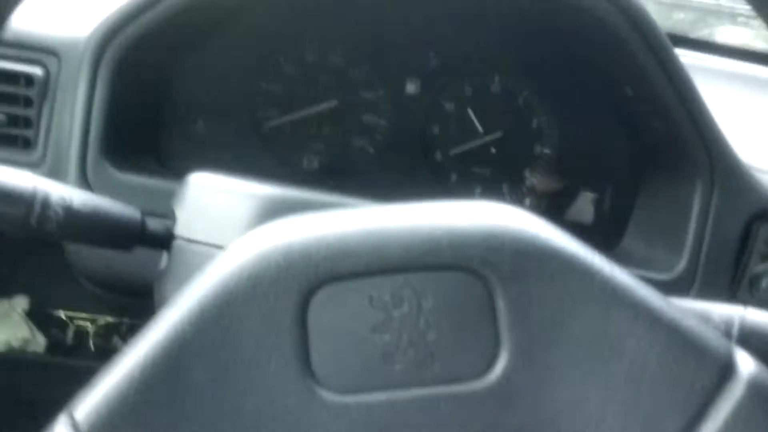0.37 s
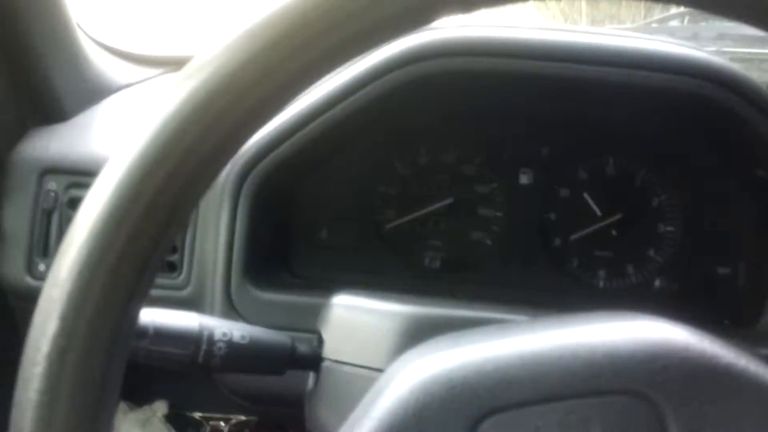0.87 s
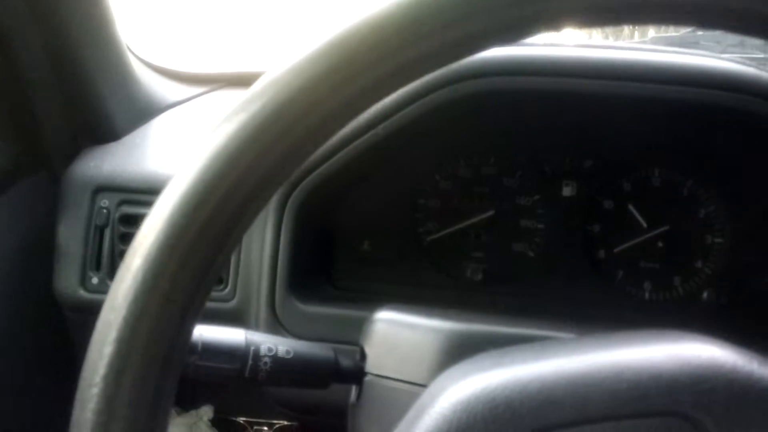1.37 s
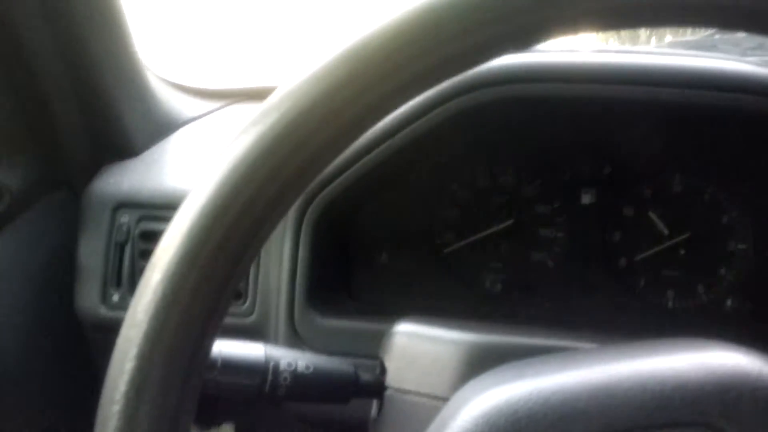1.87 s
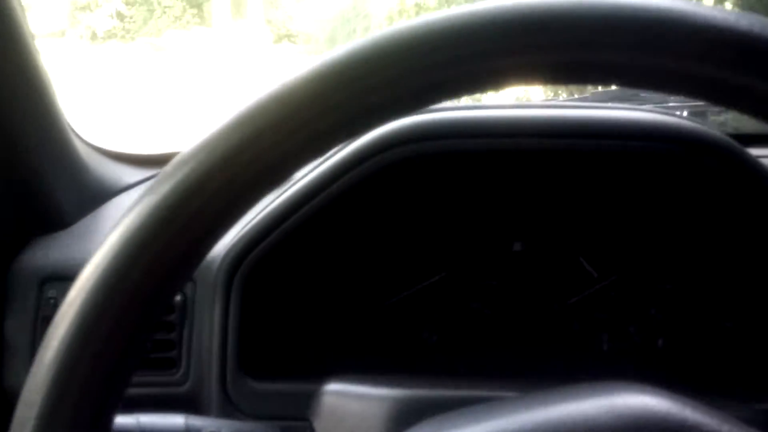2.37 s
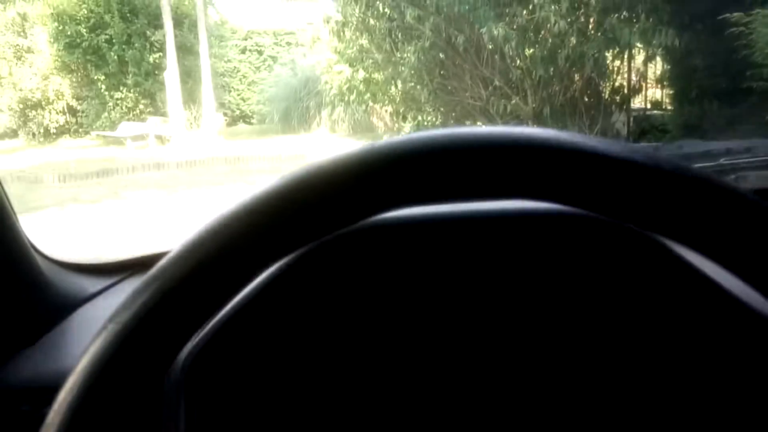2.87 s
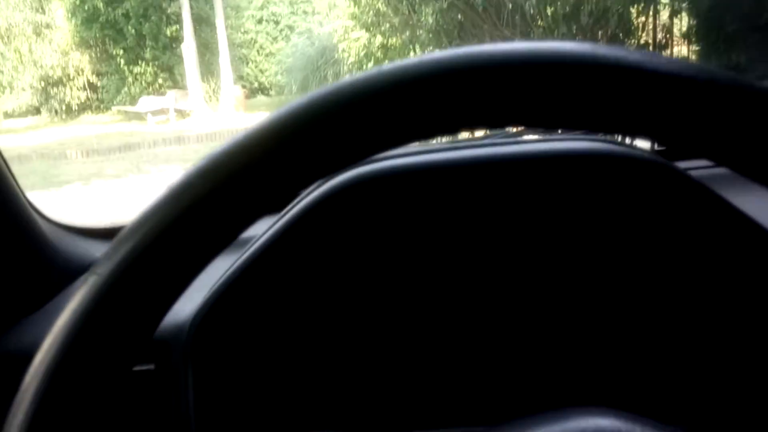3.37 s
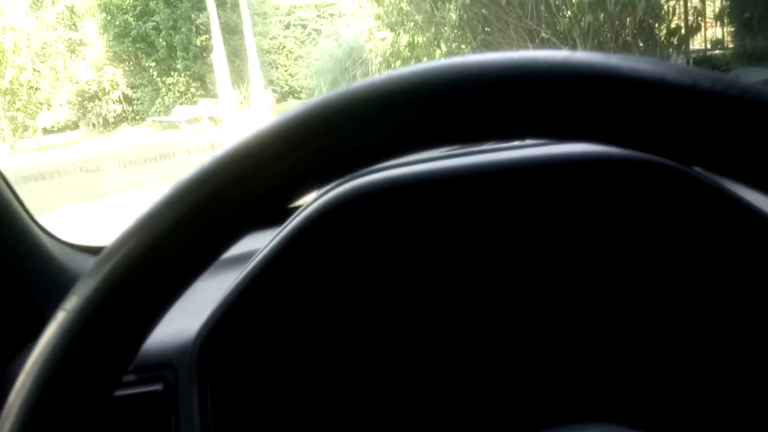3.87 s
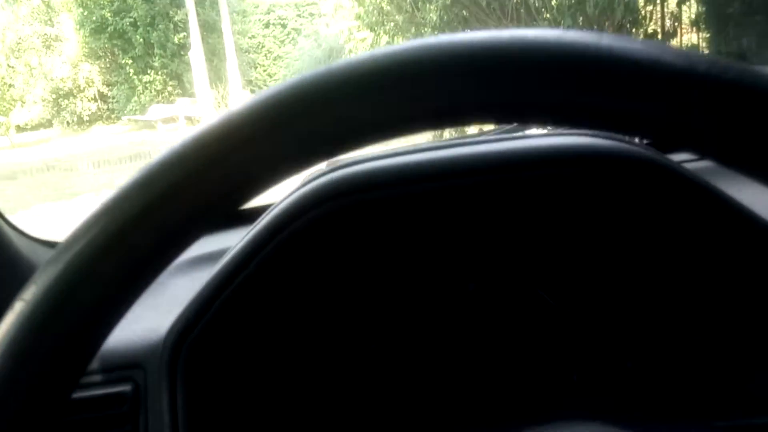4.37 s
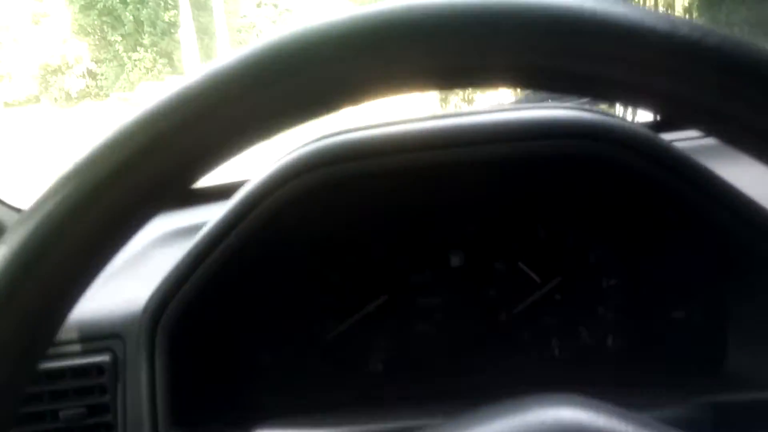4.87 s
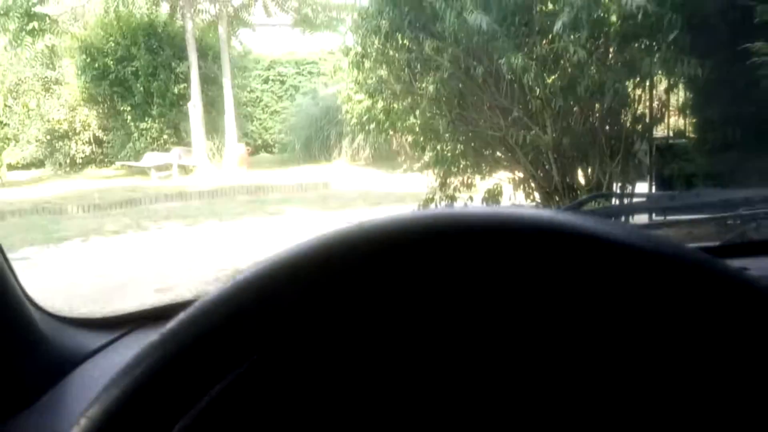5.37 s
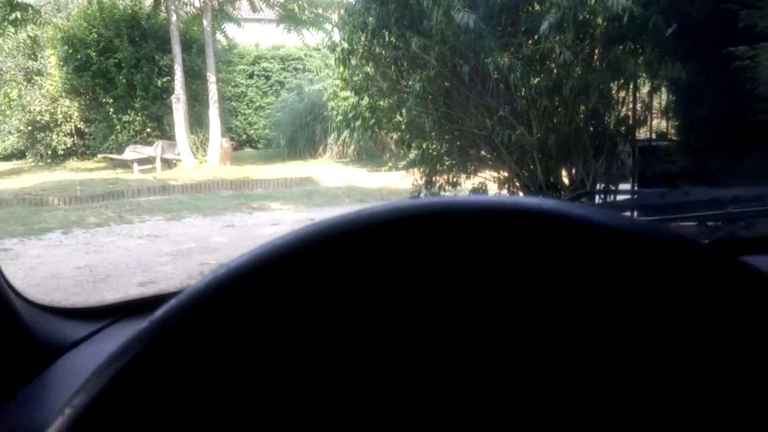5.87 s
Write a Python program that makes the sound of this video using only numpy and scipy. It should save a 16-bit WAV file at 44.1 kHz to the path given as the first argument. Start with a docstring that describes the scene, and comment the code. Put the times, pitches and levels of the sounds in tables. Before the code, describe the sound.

Inside a parked car with the engine off, a sharp key clink and thump open over a very faint hush. Small ticks, scrapes and a key rubbing in its slot follow, then a bright jingle of loose keys after two seconds. From nearly three seconds, levers and pedals knock on hollow plastic and metal, with low body thumps and late snaps. Close handheld phone microphone, small dry cabin.

```python
"""Inside a parked car, engine off, a phone near the wheel: a hush of filtered noise runs all through.
From the start a hand rustles over trim (grainy noise), the shell rocks and thumps (ringing modes), and
keys clink (sharp ticks, rattle, short pings). Soon the phone is bumped, free keys ring, small parts tick
and a key shank rubs in its slot (a gliding resonance). After two seconds levers and pedals knock on their
stops, the trim is rubbed once, the floor pan rings, and late on a sprung lever snaps into its notch."""
import sys
import numpy as np
from scipy import signal
from scipy.fft import rfft, irfft
from scipy.io import wavfile
from scipy.ndimage import uniform_filter1d

SR = 44100
rng = np.random.default_rng(int(sys.argv[2]) if len(sys.argv) > 2 else 0)


def pcm_store(signal):
    """Save signal as 16-bit PCM."""
    levels = np.round(np.clip(np.atleast_2d(signal), -1, 1) * 32767)
    wavfile.write(sys.argv[1], SR, levels.astype(np.int16).T)


def gain_from_decibels(decibels):
    """Convert decibel values to linear amplitude factors."""
    exponent = np.asarray(decibels, float) / 20
    return 10 ** exponent


N = 275184  # length in samples
T = np.arange(N) / SR  # time in seconds

# Levels in the tables are starting points: the functions add their own balance.
# Outdoor hush and microphone hiss, shape of the spectrum: f/Hz, level/dB
HUSH = [(15, -50), (25, -0.5), (118, 0), (373, -4), (561, -6), (822, -9), (1110, -10.5), (1380, -9),
        (2810, -22.5), (3400, -10), (4460, -16.5), (5260, -8.5), (10100, -32), (15200, -15), (17000, -52)]
HUSH_DB = -75  # overall rms
# Noise of rubbing or rattling surfaces, shape of the spectrum: f/Hz, level/dB
CONTACT = [(240, -73.5), (400, -11), (726, -4.5), (904, -2), (1030, 0.5), (1380, -5), (2470, 2.5),
           (2840, -2), (5240, 0), (6530, -3), (7880, -21), (10300, -10.5), (13600, -18), (15200, -4.5),
           (17000, -58.5)]
# Borders of the four bands of clinks and knocks: f/Hz
EDGES_HZ = (1100, 1600, 4000, 8000, 17000)
# Light rustle of hand and cloth: t/s, level of 2-8 kHz/dB
SLIDE = [(0, -68), (.17, -67.5), (.3, -77), (.55, -78), (.7, -71.5), (1.0, -66), (1.2, -75.5), (1.5, -80),
         (2.0, -78.5), (2.6, -77.5), (2.9, -69), (3.4, -75), (3.65, -79.5), (3.93, -64.5), (4.12, -80.5),
         (4.62, -69.5), (5.3, -77.5), (5.62, -67), (6.24, -69.5)]
# The shell rocking on seat and springs: t/s, level/dB
ROCKING = [(0, -45), (.15, -81), (.28, -71), (.42, -80.5), (2.75, -81.5), (2.94, -61), (3.08, -64),
           (3.44, -66.5), (3.58, -55.5), (3.72, -87.5), (3.83, -46), (4.1, -79.5), (4.4, -64.5),
           (4.66, -55.5), (4.8, -86), (4.99, -60), (5.13, -73), (5.39, -66), (5.58, -47.5), (6.24, -53.5)]
# Modes of the body shell: f/Hz, level/dB, time to fall by 60 dB/s
SHELL = [(63.5, -14.5, 0.55), (112, -3, 0.16), (141.6, -4.5, 0.23), (191.2, -4.5, 0.16), (255.8, -3.5, .12),
         (331.3, 2, 0.052), (437, -8.5, 0.091), (633, -16.5, 0.12), (682.6, -4, 0.052), (771, -5, 0.063),
         (869.4, 0, 0.056), (1016, -6.5, 0.061)]
# Key clinks: t/s, peak of 4-8 kHz/dB, 1.5-4 kHz re peak/dB, above 8 kHz re peak/dB,
# chatter fall time/s (limited, then scaled for each band)
CLINKS = [(0.0024, -14.5, -9.5, -5, 0.034), (0.1104, -39, -3, -6.5, 0.0057), (0.117, -31, 2, -9, 0.028),
          (.130, -44, 0, -13.5, 0.02), (0.1485, -40.5, 0, -8, 0.021), (0.1502, -24.5, -5, -3.5, 0.034),
          (0.1559, -20.5, 5, -25.5, 0.0093), (0.168, -48.5, -13, 14, 0.034), (0.194, -51, 2, -25, 0.034),
          (0.741, -36.5, -14, -4.5, 0.069), (0.7459, -29, -5, -9, 0.013), (0.7996, -51, 7, -15.5, 0.0071),
          (0.807, -36.5, -3.5, -21.5, 0.021), (0.8133, -35, -8, -4, 0.074), (0.939, -55, -40, -20, .036),
          (0.9577, -59, 3, -21, 0.048), (1.042, -29, -15.5, -6, 0.068), (1.176, -54, -29, -3, .076),
          (1.203, -49.5, -19, 3, 0.049), (1.227, -43.5, -20, -29.5, 0.049), (1.255, -47, -31, -10, 0.05),
          (1.269, -38.5, -15.5, -3, 0.079), (1.51, -57.5, -7, 12, 0.08), (1.649, -62, 10, -3, 0.03),
          (1.94, -57, -7, -3.5, 0.37), (1.9655, -42.5, -10, -13, 0.025), (2.0318, -36, 0, 8, 0.077),
          (2.0577, -34, -11, -3, 0.06), (2.078, -43.5, -12, -8, 0.12), (2.3179, -38.5, -11, -3, 0.13),
          (2.3272, -31.5, -8, -10.5, 0.068), (2.3491, -34.5, 8, -18, 0.036),
          (2.3658, -33.5, -11.5, -8, 0.045), (2.375, -28.5, -10.5, -6, 0.029),
          (2.3852, -24, -7, -14, 0.035), (2.3946, -25.5, -6, -3, 0.057),
          (2.4167, -26.5, -12.5, -5.5, 0.045), (2.4363, -47.5, 2, 0, 0.1), (2.461, -46, -2, -13, 0.14),
          (2.478, -48, -5, 13, 0.028), (2.4875, -23.5, -14, 3.5, 0.032), (2.4935, -40, -7, 1.5, 0.099),
          (2.5249, -34.5, -7, -4, 0.058), (2.541, -46.5, -4.5, -17, 0.24), (2.649, -56.5, -3, -9, 0.031),
          (2.9983, -36, 0.5, -23, 0.12), (3.0175, -56, -9, -14, 0.059), (3.295, -41.5, -3, -39, 0.1),
          (3.3677, -36.5, -4, -38.5, 0.076), (3.397, -48.5, -8.5, -24, 0.29),
          (3.937, -36.5, 1.5, -10, 0.07), (3.9454, -31, -11, -9, .06), (3.949, -39, -9, 0.5, 0.11),
          (3.966, -35.5, -9, -9, 0.1), (3.985, -41, -6.5, -5, 0.069), (4.318, -47, -6, 6, 0.053),
          (4.5222, -38.5, 3, -6, 0.078), (4.9378, -38, -2, -3, 0.11), (5.202, -37.5, 5.5, -4.5, 0.1),
          (5.5167, -33, -27, -6, 0.064), (5.667, -32, -5.5, -10.5, 0.062), (5.8916, -33, -3, -11, 0.072),
          (5.9, -31, -4, -11, 0.16), (6.112, -38.5, -20, 9.5, 0.061), (6.193, -43, 1.5, -4, 0.074)]
# Modes of three free keys, one list a key: f/Hz, level/dB, time to fall by 60 dB/s
KEYS = [
    [(3055, 0, .12), (3715, -3, .14), (8480, -9, .07), (12900, -13, .06)],
    [(7432, -23, .18), (9930, -14, .08), (11620, -18, .06), (15030, -4, .06), (15440, -5, .04),
     (15720, -3, .035), (14650, -6, .035)],
    [(2150, -8, .05), (4650, -5, .05), (5130, -2, .06), (5340, -2, .07), (6560, -3, .06), (10500, -9, .03)],
]
# Thumps into the shell: t/s, peak under 170 Hz/dB, 170-600 Hz re peak/dB, 600-1100 Hz re peak/dB
THUMPS = [(0.003, -34, 1, 0.5), (0.048, -59, 5, -26), (0.076, -62, 5, -15), (0.128, -40.5, 4, -2),
          (0.155, -48.5, 5.5, 1), (0.165, -37.5, -6, -23), (0.247, -46.5, 0.5, -19), (0.27, -63, 8, -9),
          (2.774, -48, 14.5, 21), (2.794, -34.5, 13, 5), (2.818, -26.5, -16, -3),
          (2.843, -24.5, -9.5, -2.5), (2.871, -34.5, -2.5, -7), (2.914, -31, -10, -30),
          (2.946, -34.5, -21, -39), (2.974, -42, -24, -47), (2.997, -42.5, -14, -14),
          (3.161, -26.5, -1.5, -23), (3.185, -34.5, -4.5, -23), (3.301, -43, -13.5, -20),
          (3.446, -40.5, 9, 11.5), (3.487, -24.5, -13, -14.5), (3.576, -51, -9, -21),
          (3.617, -42.5, -22, -6), (3.809, -38.5, 4, 14.5), (3.844, -39.5, 8, 11), (3.864, -33, -3.5, -4.5),
          (3.948, -43.5, -11, -8), (4.144, -75, 0, 20.5), (4.453, -48.5, 2, 11), (4.811, -50.5, 8, 23.5),
          (4.862, -36.5, 2, -7), (4.908, -40, -4, -20), (4.846, -37.5, -9, -1), (4.888, -35.5, -13, -5),
          (5.011, -42, -0.5, 15.5), (5.2718, -47, -1, 16), (5.414, -36, 7, 13), (5.53, -32, -3.5, 1.5),
          (5.62, -41.5, 7, 7), (5.687, -32.5, -3.5, -5.5), (5.738, -34, -18, 0.5), (5.846, -72, -5, 20),
          (5.872, -38, 6, 13), (5.902, -38, 5.5, -10), (6.09, -70, 2, 15), (6.112, -36.5, 11, 10),
          (6.127, -23, -4.5, -13)]
# Short firm scrapes: start/s, end/s, level of 0.5-2 kHz/dB, level of 2-8 kHz/dB, level above 8 kHz/dB
SCRAPES = [(0.035, 0.174, -100, -76, -65.5), (0.629, 0.763, -58.5, -58.5, -76),
           (0.719, 0.764, -55, -59, -69), (0.777, 0.821, -68.5, -62, -67), (0.932, 0.999, -70, -59.5, -65),
           (1.188, 1.29, -83, -68, -73), (1.392, 1.459, -100, -71.5, -88),
           (1.633, 1.701, -72, -65.5, -89.5), (3.587, 3.646, -54.5, -68, -84),
           (4.305, 4.363, -69, -67.5, -79.5), (4.825, 4.954, -58.5, -61.5, -78),
           (5.04, 5.1, -63, -71, -100), (5.184, 5.229, -58.5, -63, -83), (5.51, 5.592, -55, -61, -79),
           (5.658, 5.736, -58, -55, -58.5), (5.877, 5.926, -50, -48, -77)]
# Modes of the hollow trim: f/Hz, level/dB, time to fall by 60 dB/s
TRIM = [(1274, 4.5, 0.056), (1451, 3.5, 0.035), (1583, -5, 0.093), (1785, 1, 0.016), (2082, -7.5, 0.064),
        (2319, -7, 0.022), (2850, -3, 0.019), (3137, -12.5, 0.075)]
# Bumps on the phone: t/s, peak/dB, pulse width/s
BUMPS = [(0.1242, -21, 0.0008), (0.1241, -22.5, 0.00032), (0.137, -33, 0.0024), (2.847, -25, 0.0013),
         (3.17, -34, 0.00067), (3.183, -26.5, 0.0018)]
# Free keys struck: t/s, which key (counted from 0), level/dB
JINGLES = [(0.332, 1, -61.5), (0.941, 2, -51), (1.197, 1, -54), (1.646, 0, -73), (1.964, 2, -49),
           (2.029, 0, -48.5), (2.011, 1, -62), (2.015, 2, -58), (2.032, 1, -28.5), (2.031, 2, -41),
           (2.0563, 1, -27), (2.3255, 0, -35.5), (2.3255, 1, -39), (2.3257, 2, -41), (2.3513, 0, -40),
           (2.3515, 2, -36), (2.393, 1, -40), (2.393, 2, -39), (2.417, 1, -40), (2.4172, 2, -36.5),
           (3.099, 2, -56), (3.112, 0, -62.5), (3.292, 0, -52.5), (3.294, 2, -67), (3.401, 2, -61),
           (3.937, 0, -41.5), (3.937, 1, -49), (3.939, 2, -34), (3.951, 0, -36.5), (3.952, 1, -26.5),
           (3.9875, 1, -45), (3.986, 0, -57), (2.495, 0, -46), (2.487, 1, -41.5), (4.281, 0, -69),
           (4.902, 2, -59), (4.937, 1, -40), (4.936, 2, -43), (5.892, 0, -41), (5.895, 1, -30.5)]
# Faint pitched ticks of small parts touching: t/s, f/Hz, peak/dB
PIPS = [(0.389, 4750, -59), (0.4037, 5130, -48), (.4135, 4860, -45), (.4365, 4870, -51), (.4365, 3100, -53),
        (.498, 5780, -49.5), (1.406, 2570, -48), (1.406, 5500, -54), (1.434, 4860, -51),
        (1.433, 2800, -57.5), (1.51, 4900, -51), (1.517, 4940, -53), (1.6485, 3660, -37),
        (1.684, 3900, -39), (1.684, 5500, -45)]
# A key shank sliding into its slot: start/s, end/s, first f/Hz, last f/Hz, level/dB
SLOT = [(0.625, 0.69, 1157, 832, -62.5), (0.652, 0.677, 1592, 1440, -54.5), (0.684, 0.707, 1380, 686, -60),
        (.718, 0.744, 967, 1130, -65), (0.751, 0.764, 1210, 520, -55)]
# Lever and pedal knocks: t/s, peak of 1.1-1.6 kHz/dB, 1.6-4 kHz re peak/dB, 4-8 kHz re peak/dB,
# rattle fall time/s (limited, then scaled for each band)
KNOCKS = [(2.209, -67, -11, -17, 0.042), (2.724, -69.5, 20.5, -10, 0.25), (2.764, -51, 20.5, 18, 0.099),
          (2.772, -34, 9.5, 0, 0.096), (2.7902, -28, 13.5, 12, 0.064), (2.8042, -34, 6.5, 9, 0.15),
          (2.8194, -31.5, 9, 0, 0.044), (2.848, -53, 14, 3, 0.15), (3.294, -54.5, -17, -6, 0.43),
          (3.364, -52, -25, -13, 0.085), (3.44, -32, 16, 17, 0.054), (3.577, -53, 17.5, -12, 0.062),
          (3.594, -50.5, 10.5, -26, 0.09), (3.6158, -44, 13.5, 1, 0.089), (3.807, -23, 9, -2, 0.046),
          (3.846, -38.5, 14, 1, 0.13), (3.8562, -34, 12, 10.5, 0.055), (4.143, -69.5, 14, -5.5, 0.11),
          (4.349, -71.5, 25.5, 11.5, 0.14), (4.4515, -47, 17, 9, 0.072), (4.602, -43.5, 15, -2, 0.064),
          (4.8075, -35.5, 10.5, 10.5, 0.056), (4.8434, -40.5, 13.5, -3, 0.065),
          (5.01, -34, 11.5, 2.5, 0.079), (5.0568, -67, 29, -14, 0.14), (5.2685, -24, 5.5, -10.5, 0.053),
          (5.38, -64, 24, 1, 0.15), (5.4097, -29.5, 8.5, -5, 0.05), (5.525, -34.5, 6.5, -24, 0.036),
          (5.571, -47, 13, 4, 0.12), (5.617, -39.5, 17, 4.5, 0.045), (5.626, -44, 19.5, 12, 0.056),
          (5.7335, -41, 15.5, 14.5, 0.048), (5.869, -28, 6.5, -10, 0.065), (5.9, -42.5, -1, 8.5, 0.13),
          (6.111, -34, 18.5, 17, 0.054)]
# Blows that reach the floor pan: t/s, peak under 600 Hz/dB, higher modes re peak/dB
PAN_BLOWS = [(2.775, -35.5, 8.5), (2.794, -28, 11), (2.82, -38, 16.5), (2.844, -35, -5), (3.446, -31, 9.5),
             (3.486, -34, -24), (3.809, -45.5, 13.5), (3.864, -40.5, 5), (4.846, -40.5, 4), (5.57, -45, 12),
             (5.904, -46.5, 10.5)]
# Modes of the floor pan: f/Hz, level/dB, time to fall by 60 dB/s
PAN = [(206.4, 2.5, 0.29), (701, -9, 0.15), (807, -18, 0.16), (889, -14.5, 0.14), (1026, -6, 0.1)]
# A sprung lever snapping into its notch: t/s, level/dB
SNAPS = [(4.8107, -23), (5.0115, -23.5), (5.271, -28)]
# Modes of that lever: f/Hz, level/dB, time to fall by 60 dB/s
LEVER = [(427, -13, 0.11), (630, -5, 0.048), (1309, 3.5, 0.042), (1390, -1, 0.049), (1593, 3.5, 0.023),
         (2038, -2.5, 0.041), (2254, 10, 0.012), (2655, -18, 0.14)]


def coloured(points):
    """Noise of rms 1 whose spectrum follows the given points of frequency and level."""
    hz, db = np.transpose(points)
    f = np.maximum(np.fft.rfftfreq(N, 1 / SR), 1)
    gain = gain_from_decibels(np.interp(np.log(f), np.log(hz), db))
    x = irfft(rfft(rng.standard_normal(N)) * gain, N)
    return x / x.std()


def hush():
    """Faint outdoor hush and microphone hiss, as one steady noise."""
    return gain_from_decibels(HUSH_DB) * coloured(HUSH)


def bandpass(x, order, lo_hz, hi_hz):
    """Lets through only what lies between two frequencies."""
    return signal.sosfilt(signal.butter(order, [lo_hz, hi_hz], "band", fs=SR, output="sos"), x)


def highpass(x, order, cut_hz):
    """Weakens what lies below the cut."""
    return signal.sosfilt(signal.butter(order, cut_hz, "high", fs=SR, output="sos"), x)


def band(x, lo_hz, hi_hz):
    """One band of x, brought to rms 1."""
    y = bandpass(x, 3, lo_hz, hi_hz)
    return y / y.std()


def curve(table):
    """Gain over time, joining the levels in dB of a table of times and levels."""
    t, db = np.transpose(table)
    return gain_from_decibels(np.interp(T, t, db))


def walk(rate):
    """Random wandering level with a spread near 1: about `rate` new values a second, joined by slopes."""
    k = int(SR / rate)
    steps = np.repeat(rng.standard_normal(N // k + 1), k)
    return 1.12 * uniform_filter1d(steps, k)[:N]


def contact_noise():
    """Contact noise whose narrow bands wax and wane, so that its colour keeps changing."""
    patchy_db, patchy_rate = 3.2, 14  # depth; changes a second
    x = coloured(CONTACT)
    out = 0
    for hz in EDGES_HZ[0] * 2 ** np.arange(0, 4, 1 / 8):
        narrow = bandpass(x, 2, hz / 1.035, hz * 1.035)
        out = out + gain_from_decibels(patchy_db * walk(patchy_rate)) * narrow
    return out


def sliding_grain(rough):
    """Surfaces catch and slip in dense tiny grains: the whole noise, then its low, mid and top bands."""
    grain = gain_from_decibels(2.4 * walk(900) + 1.8 * walk(150))
    x = coloured(CONTACT) * grain
    low = band(x, 500, 2000)
    mid = band(x / 2 + rough / rough.std() * grain, 2000, 8000)
    top = band(x, 8000, 16500)
    return x, low, mid, top


def rustle(low, mid, top):
    """Skin and cloth slide lightly: grainy noise, strongest in the mid band, that swells and fades."""
    return curve(SLIDE) * (mid + gain_from_decibels(-15) * top + gain_from_decibels(-7.5) * low)


def rocking():
    """Shifts of weight keep the lowest shell modes murmuring in fits and starts."""
    push = rng.standard_normal(N) * gain_from_decibels(4.5 * walk(16))
    low = sum(gain_from_decibels(db) * band(push, hz / 1.167, hz * 1.124) for hz, db, _ in SHELL[:3])
    low = low + gain_from_decibels(-11) * gain_from_decibels(5 * walk(30)) * band(push, 160, 700)
    return curve(ROCKING) * low / low.std()


def bursts(times, gains, t60s, rise_s):
    """Envelope that builds up, then falls exponentially, for each contact."""
    env = np.zeros(N)
    for s, gain, t60 in zip(times, gains, t60s):
        i = int(s * SR)
        t = T[:min(int((1.5 * t60 + rise_s) * SR), N - i)]
        fall = gain_from_decibels(-60 * np.maximum(t - rise_s, 0) / t60)
        env[i:i + len(t)] += gain * np.minimum(t / rise_s, 1) * fall
    return env


def chatter(times, band_db, t60s, rise_s, noise):
    """Rough rattle of loose contact in four bands, the treble dying first."""
    crest = 2.275  # peak over rms of a noise burst
    out = 0
    for db, x, stretch in zip(band_db, noise, (1.6, 0.95, 0.8, 0.67)):
        rattle = bursts(times, gain_from_decibels(db) / crest, np.clip(t60s, 0.008, 0.4) * stretch, rise_s)
        out = out + gain_from_decibels(0.56 * walk(400)) * x * rattle
    return out


def ticks(times, band_db):
    """The first touch of steel on steel: one sharp impulse, shaped band by band."""
    size = rng.standard_normal((len(times), 2))
    out = 0
    for db, lo, hi in zip(band_db, EDGES_HZ, EDGES_HZ[1:]):
        spikes = np.zeros(N)
        height = gain_from_decibels(db + 1.2 * size[:, 0]) * SR / (2 * (hi - lo))  # a narrow band needs a taller spike
        spikes[(times * SR).astype(int)] = height * np.sign(size[:, 1])
        out = out + bandpass(spikes, 3, lo, hi)
    return out


def ring(times, db, modes, scatter_db, blur_s):
    """Every blow starts each mode with its own strength and sign; rebounds delay the modes and let them swell."""
    chance = rng.standard_normal((len(times), len(modes), 3))
    out = np.zeros(N)
    for k, (hz, mode_db, t60) in enumerate(modes):
        blows = np.zeros(N)
        at = np.minimum((times + blur_s * np.abs(chance[:, k, 2])) * SR, N - 1).astype(int)
        strength = gain_from_decibels(db[k] + mode_db + scatter_db * chance[:, k, 0])
        np.add.at(blows, at, strength * np.sign(chance[:, k, 1]))
        w = 2 * np.pi * hz / SR
        long_r, short_r = gain_from_decibels(-60 / (t60 * SR)), np.exp(-1 / (blur_s * SR))
        # taking away a quickly dying copy softens the start
        for gain, r in ((0.81, long_r), (-0.46, short_r)):
            out += gain * signal.lfilter([0, np.sin(w)], [1, -2 * r * np.cos(w), r * r], blows)
    return out


def clinks(noise):
    """Small steel parts held in the hand: dry ticks, rattle and short damped pings, with almost nothing low."""
    s, db, mid, top, t60 = np.transpose(CLINKS)
    band_db = np.array([db + mid - 15, db + mid, db, db + top])
    dry = chatter(s, band_db - 2, t60, 0.0002, noise) + ticks(s, band_db - 1)
    # the hand makes the modes of a key die four times as fast
    free = KEYS[2][1:] + [(2520, 0, 0.06), (3200, 0, 0.06), (3650, 0, 0.06)]
    held = [(hz, mode_db, fall / 4) for hz, mode_db, fall in free]
    drive_db = [db - 10.5 + (mid if hz < EDGES_HZ[2] else 0) for hz, _, _ in held]
    dry += ring(s, drive_db, held, 3.5, 0.0002)
    return highpass(dry, 3, 1700)


def shell_thumps():
    """Heavy blows ring the panels and cabin air, and loose panels buzz briefly as well."""
    s, db, pan, panel = np.transpose(THUMPS)
    drive_db = [db - 4 + (0 if hz < 170 else pan if hz < 600 else panel) for hz, _, _ in SHELL]
    out = ring(s, drive_db, SHELL, 3.15, 0.003214)
    buzz = band(rng.standard_normal(N), 500, 1100)
    return out + buzz * bursts(s, gain_from_decibels(db + panel - 10.5), 0 * s + 0.1, 0.0046)


def scrapes(x, low, mid, top):
    """Firmer scrapes of hand and key shanks also set the hollow trim and upper shell modes sounding."""
    hollow = sum(gain_from_decibels(db + 4 * walk(25)) * band(x, hz / 1.04, hz * 1.04) for hz, db, _ in SHELL[-4:] + TRIM)
    low = low + gain_from_decibels(-4) * hollow / hollow.std()
    out = 0
    for start, end, low_db, mid_db, top_db in SCRAPES:
        touch = np.clip(np.minimum((T - start) / 0.0089, (end - T) / 0.015), 0, 1)
        out = out + touch * (gain_from_decibels(low_db) * low + gain_from_decibels(mid_db) * mid + gain_from_decibels(top_db) * top)
    return out


def phone_bumps():
    """Bumps on the phone itself: single dull pulses, a main dip between two smaller humps."""
    out = np.zeros(N)
    for s, db, width_s in BUMPS:
        u = (T - s) / width_s
        out -= gain_from_decibels(db) * (1 - u ** 2) * np.exp(-np.clip(u ** 2, 0, 99) / 2)
    return out


def jingles():
    """Free keys, when struck, ring thin and long in their own modes."""
    s, which, db = np.transpose(JINGLES)
    out = 0
    for k, key in enumerate(KEYS):
        hit = np.round(which) == k
        out = out + ring(s[hit], [db[hit]] * len(key), key, 2, 0.0001)
    return out


def pips():
    """Small parts touch: each tick rings a tight cluster of three damped modes around its own pitch."""
    t60_s, rise_s = 0.026, 0.00043
    spread = rng.standard_normal((len(PIPS), 3))
    out, t = np.zeros(N), T[:SR // 20]
    for (s, hz, db), cluster in zip(PIPS, spread):
        i = int(s * SR)
        tones = np.sin(2 * np.pi * hz * (1 + 0.043 * cluster[:, None]) * t).mean(axis=0)
        out[i:i + len(t)] += gain_from_decibels(db - 60 * t / t60_s) * np.minimum(t / rise_s, 1) * tones
    return out


def slot():
    """A key shank slides into its slot: coarse rubbing grain in a narrow resonance that glides."""
    half_width_hz = 62  # slow noise on a tone spreads this far to each side
    slow = signal.butter(2, half_width_hz, fs=SR, output="sos")
    a, b = signal.sosfilt(slow, rng.standard_normal((2, N)))
    out = 0
    for start, end, from_hz, to_hz, db in SLOT:
        phase = 2 * np.pi * np.cumsum(np.interp(T, [start, end], [from_hz, to_hz])) / SR
        touch = np.clip(np.minimum(T - start, end - T) / 0.0087, 0, 1)
        out = out + gain_from_decibels(db) * touch * (a * np.cos(phase) + b * np.sin(phase)) / a.std()
    return out


def knocks(noise):
    """Levers and pedals hit plastic and metal stops: rattle, and the ring of hollow, woody trim."""
    s, db, mid, treble, t60 = np.transpose(KNOCKS)
    drive_db = [db - 5.5 + (mid if hz > EDGES_HZ[1] else 0) for hz, _, _ in TRIM]
    hollow = highpass(ring(s, drive_db, TRIM, 2.6, 0.00141), 2, 330)
    band_db = np.array([db - 4.5, db + mid - 5.5, db + treble, db + treble - 11.5])
    return hollow + chatter(s, band_db, t60, 0.0047, noise)


def hollow_rub(x):
    """One faint hollow rub: a narrow band of the sliding noise that swells and fades."""
    at_s, spread_s, hz, level_db = 2.53, 0.042, 577, -67
    swell = np.exp(-((T - at_s) / spread_s) ** 2 / 2)
    return gain_from_decibels(level_db) * swell * band(x, hz / 1.17, hz * 1.18)


def pan_blows():
    """Blows that reach the floor pan set its own modes ringing."""
    s, db, high = np.transpose(PAN_BLOWS)
    drive_db = [db + (high if hz > 600 else 0) for hz, _, _ in PAN]
    return ring(s, drive_db, PAN, 0.92, 0.002794)


def lever_snaps():
    """A sprung lever snaps into its notch and rings in its own modes."""
    s, db = np.transpose(SNAPS)
    return highpass(ring(s, [db] * len(LEVER), LEVER, 0.93, 0.0008), 2, 330)


def cabin(x):
    """Adds dense early reflections from glass and dash, soaked up fast by seats."""
    t60_s, level_db = 0.092, -19
    t = T[:int(0.3 * SR)]
    tail = rng.standard_normal(len(t)) * gain_from_decibels(-60 * t / t60_s) * (t > 0.002)
    tail = signal.lfilter([0.5], [1, -0.45], tail)  # duller
    tail = tail / np.sqrt(np.sum(tail ** 2))
    return x + gain_from_decibels(level_db) * signal.fftconvolve(x, tail)[:N]


def scene():
    """Contacts with their cabin reflections, over the shell and the hush."""
    rough = contact_noise()
    noise = [band(rough, lo, hi) for lo, hi in zip(EDGES_HZ, EDGES_HZ[1:])]
    x, low, mid, top = sliding_grain(rough)
    sliding = rustle(low, mid, top) + scrapes(x, low, mid, top) + hollow_rub(x)
    small_parts = clinks(noise) + jingles() + pips() + slot()
    near = cabin(sliding + small_parts + knocks(noise) + lever_snaps())
    shell = rocking() + shell_thumps() + phone_bumps() + pan_blows()
    return (near + shell + hush())[None]


def top_cut(x):
    """Nothing passes above the cut-off."""
    return signal.sosfilt(signal.butter(12, 17140, fs=SR, output="sos"), x)


def record(dry):
    """The microphone loses the deepest bass, below about 36 Hz."""
    heard = highpass(dry, 1, 36)
    return top_cut(heard)


dry = scene()
out = record(dry)
pcm_store(out)
```